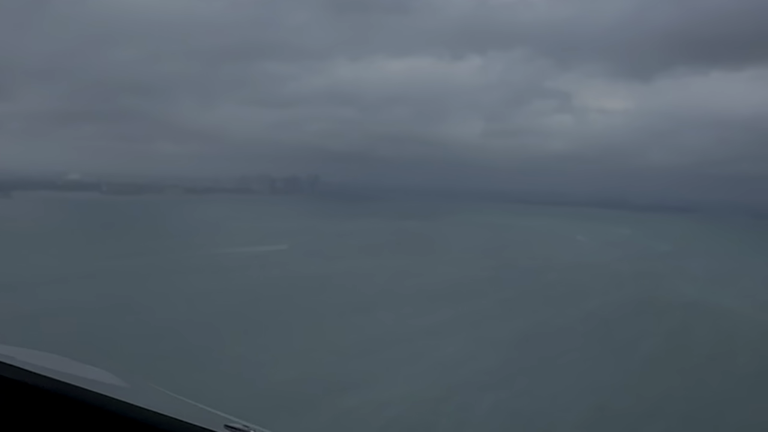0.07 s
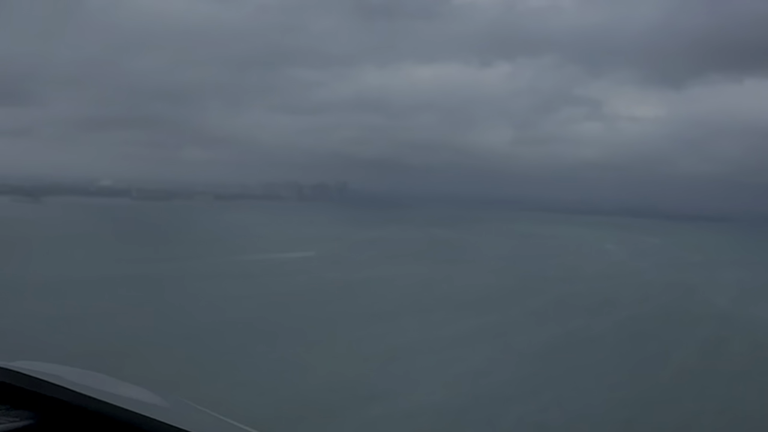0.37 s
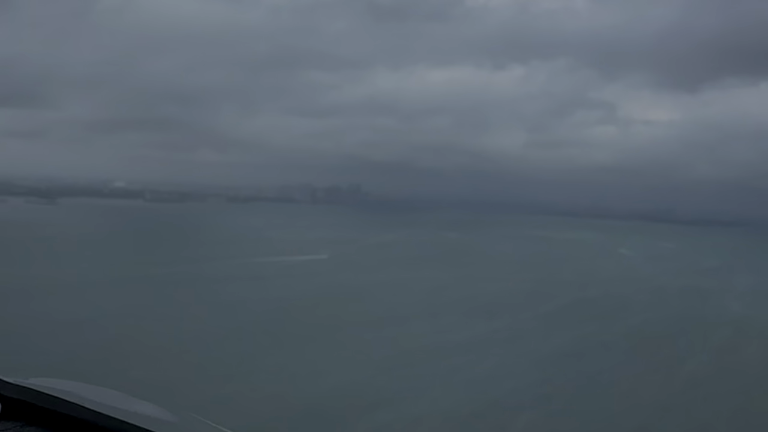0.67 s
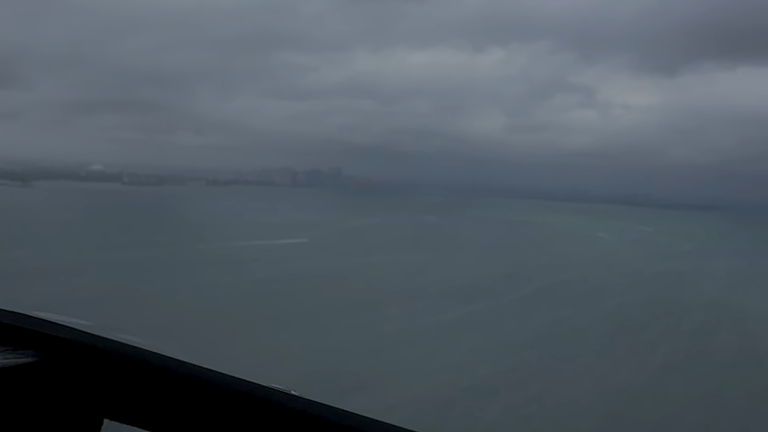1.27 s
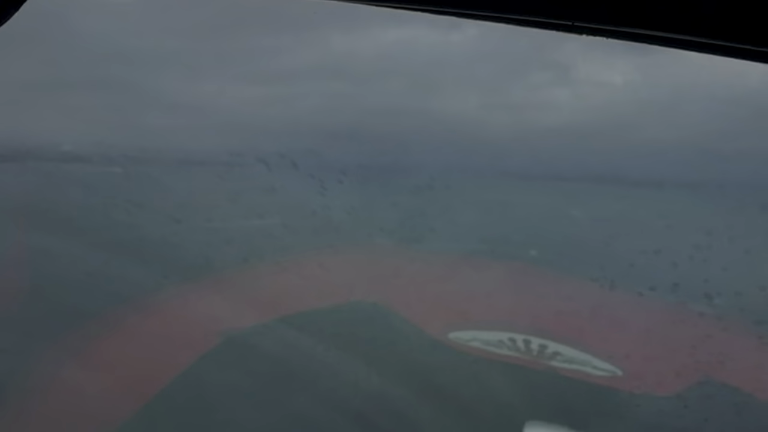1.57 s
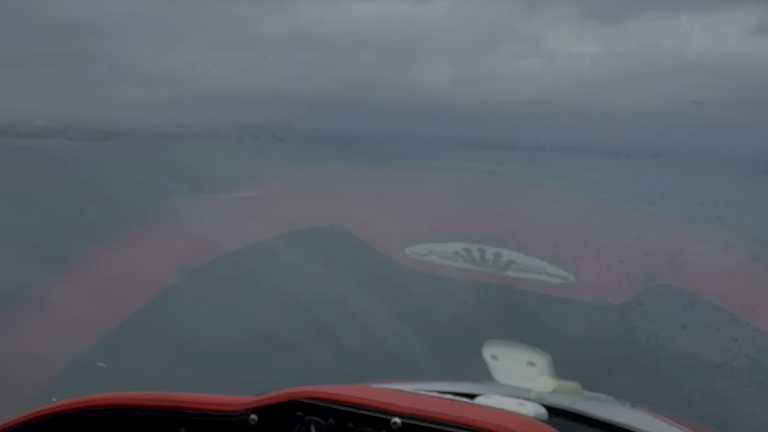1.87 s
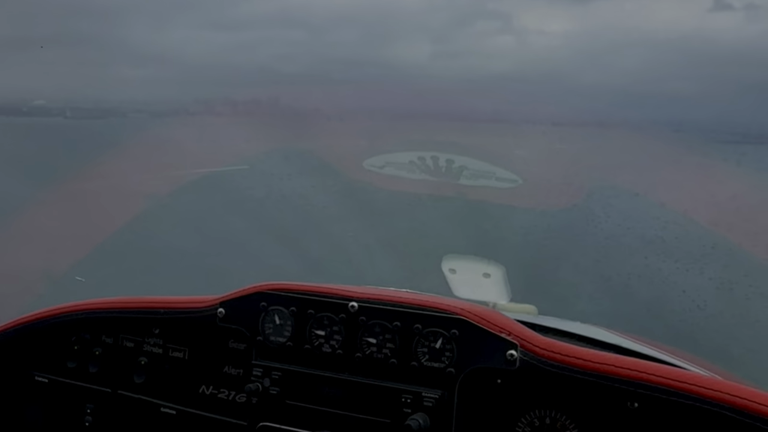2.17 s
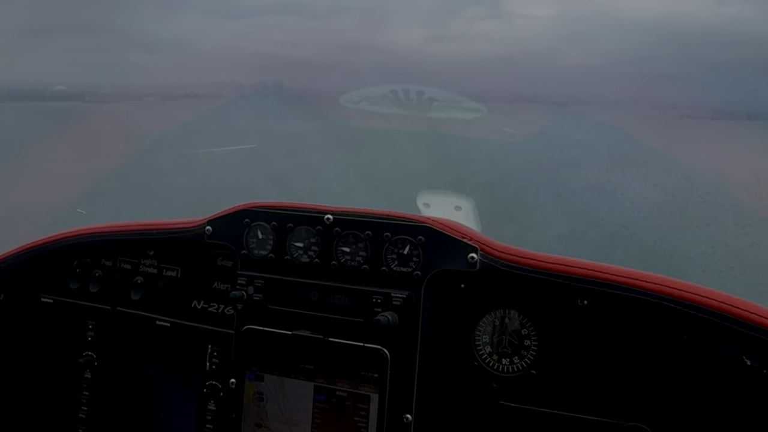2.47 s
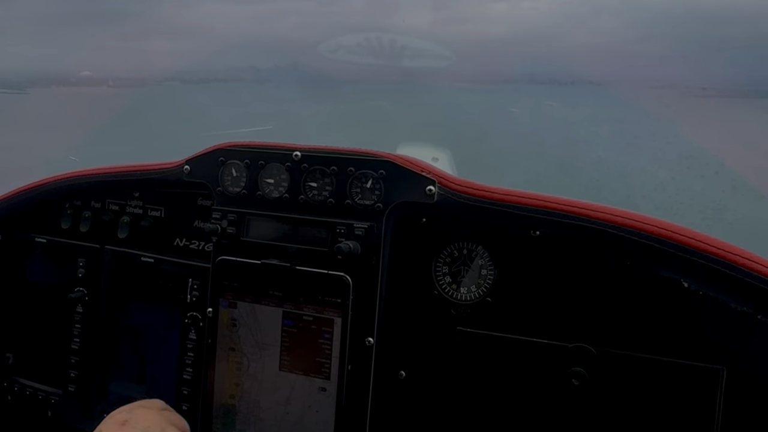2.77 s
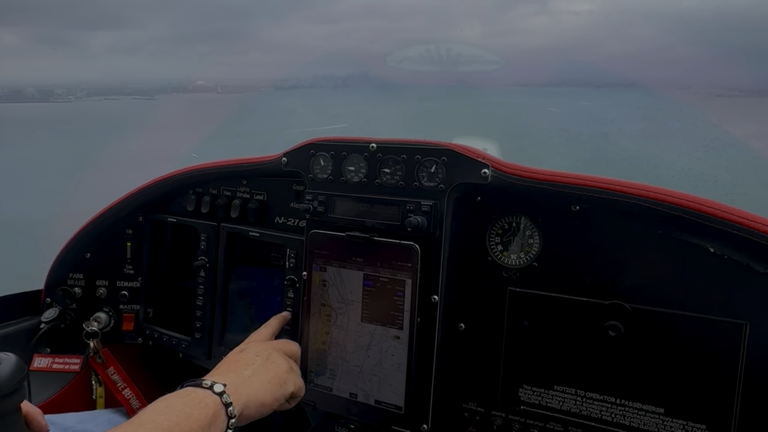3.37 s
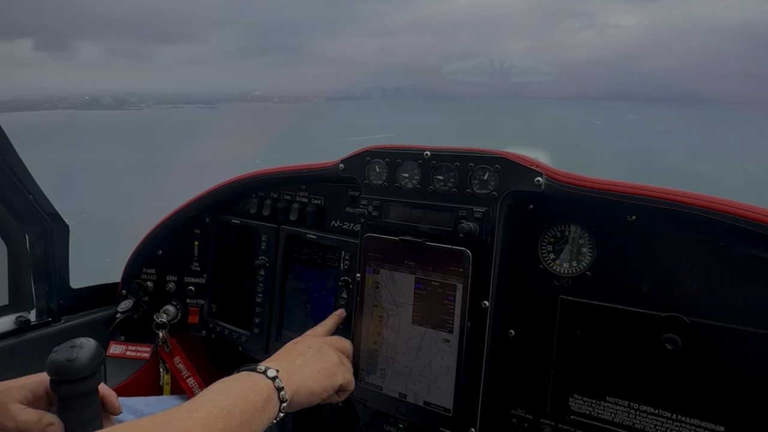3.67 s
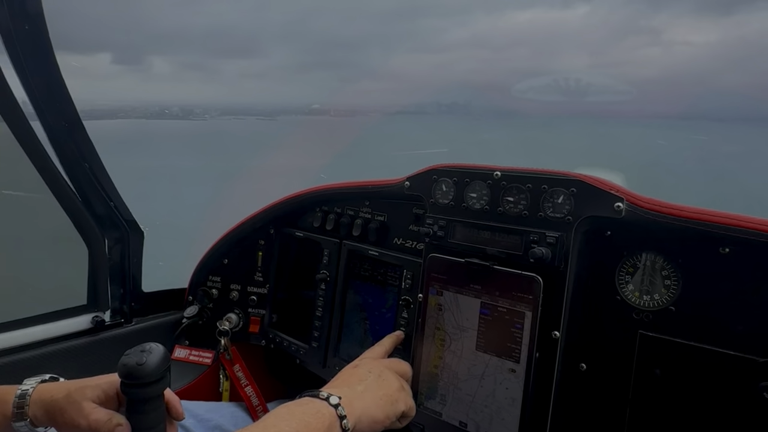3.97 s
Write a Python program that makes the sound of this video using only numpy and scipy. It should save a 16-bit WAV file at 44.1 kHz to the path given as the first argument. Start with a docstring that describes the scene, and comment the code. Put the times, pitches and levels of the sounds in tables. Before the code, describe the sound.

A small propeller plane drones in flight. Wind at the open side window buffets and crackles on the microphone, peaks in a brief howling blast, then drops away, leaving a low throbbing hum and dull rushing air inside the cabin.

```python
"""At the side window of a small propeller plane in cruise, a microphone is drawn in from the airflow.
Outside, each blade swishes past, and eddies buffet and crackle harder as the frame comes near.
At the window's edge a jet of air hits the microphone and the opening howls. In the cabin, the
propeller's throb and the engine's firing tones drone over a duller rush of air."""
import sys
import numpy as np
from scipy import signal
from scipy.fft import rfft, irfft
from scipy.io import wavfile

SR = 44100
rng = np.random.default_rng(int(sys.argv[2]) if len(sys.argv) > 2 else 0)


def output_pcm(signal):
    """Save a mono or channel-first signal as 16-bit PCM at the path in sys.argv[1].

    Samples are clipped to [-1, 1] before scaling.
    """
    pcm = np.clip(np.atleast_2d(signal).T, -1, 1) * 32767
    wavfile.write(sys.argv[1], SR, np.round(pcm).astype(np.int16))


N = 176400
T = np.arange(N) / SR
FREQS = np.fft.rfftfreq(N, 1 / SR)


def amp(db):
    """Decibels to gain."""
    return 10 ** (np.asarray(db) / 20)


def unit(x):
    """Scales to rms 1."""
    return x / np.sqrt(np.mean(x ** 2) + 1e-20)


def fader(points):
    """Gain riding through (time [s], level [dB]) points, falling 200 dB a second beyond either end."""
    times, db = np.transpose(points)
    beyond_s = np.maximum(np.maximum(times[0] - T, T - times[-1]), 0)
    return amp(np.interp(T, times, db) - 200 * beyond_s)


def colour(x, eq):
    """Shapes x with an EQ curve of (frequency [Hz], level [dB]) points, at rms 1."""
    hz, db = np.transpose(eq)
    gain = amp(np.interp(np.log(FREQS + 1), np.log(hz), db))
    return unit(irfft(rfft(x) * gain, N))


def drift(rate_hz):
    """Smooth random motion up to about rate_hz, at rms 1."""
    return unit(irfft(rfft(rng.standard_normal(N)) * np.exp(-(FREQS / rate_hz) ** 2), N))


def air(eq, flutter_db, flutter_hz):
    """Coloured noise whose level flutters with the eddies."""
    return unit(colour(rng.standard_normal(N), eq) * amp(flutter_db * drift(flutter_hz)))


def cabin(blade_cycles):
    """The inside bed: air rushes over the canopy, pulsing slightly with the blades, above a low rumble."""
    # tone of the rush and the rumble (frequency [Hz], level [dB])
    rush_eq = [(25, -31), (45, -21), (80, -1), (130, 2.5), (250, -0.5), (400, -6), (650, -10),
               (1100, -10.5), (1600, -13), (2300, -17.5), (2900, -20), (3500, -20.5), (4500, -25),
               (6300, -27), (9000, -34.5), (13000, -39.5), (16000, -42)]
    rumble_eq = [(25, -30), (50, -17), (85, 0), (140, -16), (250, -9.5), (500, -20), (1500, -20.5),
                 (6000, -60)]
    # both fade in as the microphone enters (time [s], level [dB])
    rush_ride = [(1.3, -35), (1.45, -36.5), (1.8, -36), (2.6, -36), (3.2, -36), (4, -35.5)]
    rumble_ride = [(1.5, -70), (2.6, -46), (3.2, -38), (3.6, -40), (3.76, -37), (4, -36)]
    blade_pulse = amp(0.42 * np.cos(2 * np.pi * blade_cycles))
    rush = fader(rush_ride) * air(rush_eq, flutter_db=0.87, flutter_hz=40) * blade_pulse
    rumble = fader(rumble_ride) * air(rumble_eq, flutter_db=0.5, flutter_hz=13)
    return rush + rumble


def slipstream():
    """The outside bed: air streams past, hisses on the microphone and buffets it with turbulence."""
    # tone of the broad stream, fine hiss and low buffeting (frequency [Hz], level [dB])
    stream_eq = [(30, -30), (60, -3), (120, -0.5), (250, 2), (500, 0.5), (1000, -8), (2000, -22),
                 (3200, -28.5), (6000, -31), (10000, -38), (16000, -41)]
    hiss_eq = [(500, -19), (2000, 3.5), (4000, -1.5), (7000, -6), (10000, -9), (16000, -14)]
    buffet_eq = [(25, -52), (38, -26), (58, -12), (110, -0.5), (200, -0.5), (450, -5.5), (800, -14),
                 (1600, -27.5), (4000, -42), (16000, -82)]
    # each builds, then drops away inside the window (time [s], level [dB])
    stream_ride = [(0, -27), (.8, -29.5), (1.3, -23.5), (1.44, -40), (1.5, -53), (1.6, -90)]
    hiss_ride = [(0, -55), (.4, -46), (.9, -41), (1.28, -47.5), (1.44, -52), (1.46, -90)]
    buffet_ride = [(0, -28.5), (.4, -30), (.8, -26), (.86, -23.5), (.95, -18.5), (1.0, -24.5),
                   (1.12, -27.5), (1.25, -17.5), (1.34, -15), (1.39, -28), (1.44, -19.5), (1.5, -26.5),
                   (1.58, -38.5), (1.72, -67)]
    return (fader(stream_ride) * air(stream_eq, flutter_db=0.5, flutter_hz=30.2)
            + fader(hiss_ride) * air(hiss_eq, flutter_db=0.6, flutter_hz=120)
            + fader(buffet_ride) * air(buffet_eq, flutter_db=2.7, flutter_hz=35))


def swish(blade_cycles, place, level_db=-41.5, sharpness=0.85):
    """Every passing blade throws a puff of noise, heard only outside."""
    # midrange bite of the puffs (frequency [Hz], level [dB])
    swish_eq = [(100, -30), (700, -19), (1500, 6.5), (2500, -8), (4000, -11), (8000, -37), (16000, -45)]
    puffs = np.exp(sharpness * np.cos(2 * np.pi * blade_cycles))
    outside = np.clip(1 - place, 0, 1)
    return amp(level_db) * outside * colour(puffs * rng.standard_normal(N), swish_eq)


def thump(at_s=0.888, width_s=0.008, pitch_hz=190, level_db=-12):
    """One large eddy hits the microphone with a low push of a few cycles."""
    since = T - at_s
    envelope = amp(level_db) * np.exp(-(since / width_s) ** 2)
    return envelope * np.cos(2 * np.pi * (pitch_hz * since + rng.random()))


def crackle(grains_per_s=700, spread_db=1.8, grain_decay_s=0.00027, snap_decay_s=0.002):
    """Eddies break on the microphone as it nears the window frame; a few sharp snaps stand out."""
    # bright tone of grains and snaps (frequency [Hz], level [dB])
    crackle_eq = [(300, -15), (1500, 6.5), (3500, 2.5), (6000, -3), (9000, -12.5), (16000, -28)]
    # the grains build toward the frame (time [s], level [dB])
    grain_ride = [(.8, -48), (.96, -45.5), (1.03, -36.5), (1.11, -42), (1.16, -38.5), (1.29, -36),
                  (1.43, -25.5), (1.45, -76)]
    # the sharpest snaps of wind (time [s], level [dB])
    snap_cues = [(.996, -25), (1.028, -33), (1.058, -31), (1.157, -24), (1.166, -29), (1.181, -29),
                 (1.191, -29), (1.22, -31), (1.288, -27), (1.33, -25)]
    hits = rng.random(N) < grains_per_s / SR
    strengths = amp(spread_db * np.minimum(rng.exponential(1, N), 4))
    grain_envelope = signal.lfilter([1], [1, -np.exp(-1 / (grain_decay_s * SR))], hits * strengths)
    grains = fader(grain_ride) * colour(grain_envelope * rng.standard_normal(N), crackle_eq)
    snap_envelope = sum(amp(db) * (T >= s) * np.exp(-abs(T - s) / snap_decay_s) for s, db in snap_cues)
    return grains + snap_envelope * colour(rng.standard_normal(N), crackle_eq)


def window_edge(howl_hz=461, howl_width_hz=304, core_s=1.385, core_half_s=0.039, sizzle_db=-23.5):
    """The air jet blasts the microphone, sizzles at its core and drives the opening's broad resonance."""
    # tone of the jet and its bright core (frequency [Hz], level [dB])
    jet_eq = [(50, -32), (300, -9), (700, 5.5), (1400, -1), (2600, -7.5), (4000, -7.5), (7000, -14.5),
              (11000, -21), (16000, -31)]
    sizzle_eq = [(1000, -32), (4000, -2), (8000, -5), (12000, -2), (16000, -3)]
    # blast and howl flare as the microphone crosses the edge (time [s], level [dB])
    jet_ride = [(1.325, -50), (1.339, -24), (1.346, -13.5), (1.38, -15.5), (1.412, -15.5), (1.428, -23.5),
                (1.438, -22), (1.443, -65)]
    howl_ride = [(1.0, -31), (1.26, -29.5), (1.3, -15), (1.36, -13), (1.39, -23.5), (1.42, -14.5),
                 (1.46, -23.5), (1.53, -46), (1.62, -49)]
    resonance = 1 / (1 + (2 * (FREQS - howl_hz) / howl_width_hz) ** 2)
    howl = fader(howl_ride) * unit(irfft(rfft(rng.standard_normal(N)) * resonance, N))
    in_core = np.sqrt(np.maximum(1 - ((T - core_s) / core_half_s) ** 2, 0))
    sizzle = amp(sizzle_db) * in_core * colour(rng.standard_normal(N), sizzle_eq)
    jet = fader(jet_ride) * air(jet_eq, flutter_db=1.0, flutter_hz=250)
    return howl + jet + sizzle


def harmonics(cycles, table, place, waver_db=0.81, scatter_rad=0.16):
    """Wavering harmonics whose balance follows the microphone; the high ones arrive scattered in phase."""
    multiples, *levels_by_place = np.transpose(table)
    stack = np.zeros(N)
    for k in range(1, int(multiples[-1]) + 1):
        # unlisted harmonics take their level from their neighbours
        place_db = [np.interp(k, multiples, column) for column in levels_by_place]
        db = np.interp(place, [0, 1, 2], place_db)
        phase = min(scatter_rad * (k - 1) ** 2, np.pi) * rng.uniform(-0.95, 1)
        waver = waver_db * min(k / 2, 2) * drift(rate_hz=10)
        stack += amp(db + waver) * np.sqrt(2) * np.cos(2 * np.pi * k * cycles + phase)
    return stack


def drone(blade_cycles, place, firings_per_blade=1.619):
    """One geared shaft locks the engine's firing tones to the propeller's throb."""
    # blade and firing harmonics (multiple, outside [dB], just inside [dB], back in the cabin [dB])
    propeller_partials = [(1, -36, -34.5, -22.5), (2, -25, -32.5, -27.5), (3, -38.5, -45, -39),
                          (4, -41.5, -40, -43.5), (5, -45.5, -52.5, -45.5), (6, -50, -53, -51.5),
                          (7, -56, -48, -46), (8, -41, -49, -49.5), (9, -47.5, -46.5, -52),
                          (10, -41, -57, -53.5), (11, -54, -65, -51.5), (12, -54, -54, -57),
                          (13, -62, -60, -64), (14, -53, -70, -56), (15, -48.5, -61, -71),
                          (16, -52.5, -58, -68), (17, -51, -68, -70), (18, -49, -69, -58.5),
                          (19, -67, -64, -69), (20, -54.5, -60, -64), (22, -55, -63, -62.5),
                          (23, -66, -78, -71), (26, -58, -84, -78), (28, -74, -70, -65),
                          (36, -71, -80, -86)]
    engine_partials = [(1, -38, -41.5, -40), (2, -53, -42.5, -40), (3, -44.5, -55, -44),
                       (4, -64, -55, -46.5), (5, -46, -93, -76), (6, -67, -81, -54)]
    # the window frame shadows the drone as the microphone passes it (time [s], level [dB])
    frame_shadow = [(0, -0.5), (.9, 0.5), (1.1, -1.5), (1.3, -2.5), (1.48, -4), (1.6, -2.5), (1.72, 1),
                    (1.86, -0.5), (1.91, 1), (2.1, 0.5), (4, 1)]
    propeller = harmonics(blade_cycles, propeller_partials, place)
    engine = harmonics(blade_cycles * firings_per_blade, engine_partials, place)
    return fader(frame_shadow) * (propeller + engine)


def scene():
    """The mono mix: drone and wind along the microphone's path from slipstream to cabin."""
    # blade-passing rate at the moving microphone (time [s], rate [Hz])
    blade_rate = [(0, 112.8), (1.3, 112.8), (1.42, 113.8), (1.6, 112.5), (2.45, 112.3), (2.7, 112.8),
                  (3.0, 113.05), (4, 113.0)]
    # microphone path (time [s], place [0 outside, 1 just inside the window, 2 back in the cabin])
    path = [(0, 0.084), (1.35, 0.063), (1.55, 1.05), (1.87, 0.9), (1.92, 1.25), (2.1, 1.3), (2.45, 1.39),
            (2.65, 1.72), (3.1, 2.05), (4, 1.92)]
    jitter = 0.0019 * drift(rate_hz=12)
    blade_cycles = np.cumsum(np.interp(T, *np.transpose(blade_rate))) / SR + jitter
    place = np.interp(T, *np.transpose(path))
    plane = drone(blade_cycles, place) + swish(blade_cycles, place)
    wind = slipstream() + thump() + crackle() + window_edge()
    return (plane + wind + cabin(blade_cycles))[None]


def record(dry, low_cut_hz=47, high_cut_hz=15800):
    """A soft clip rounds peaks near full scale; then a low cut and a steep high cut."""
    limited = dry / (1 + dry ** 6) ** (1 / 6)
    slope = (FREQS / low_cut_hz) ** 3  # 18 dB an octave
    trimmed = irfft(rfft(limited) * slope / np.hypot(1, slope), N)
    high_cut = signal.firwin(1023, high_cut_hz, window=("kaiser", 9), fs=SR)
    return signal.oaconvolve(trimmed, high_cut[None], "same")


dry = scene()
out = record(dry)
output_pcm(out)
```